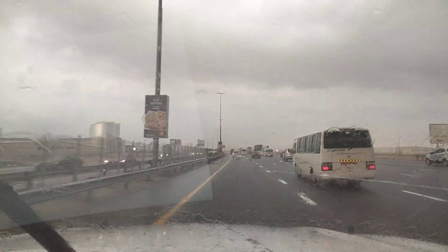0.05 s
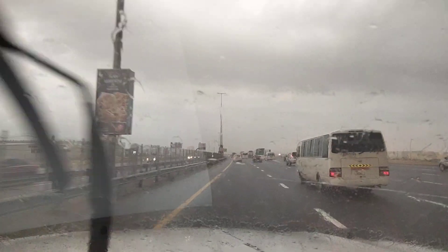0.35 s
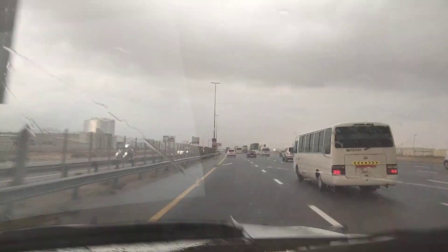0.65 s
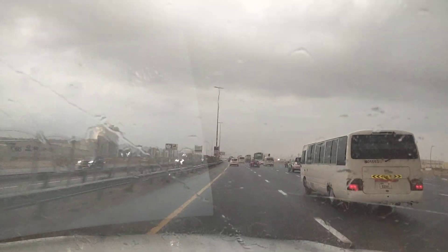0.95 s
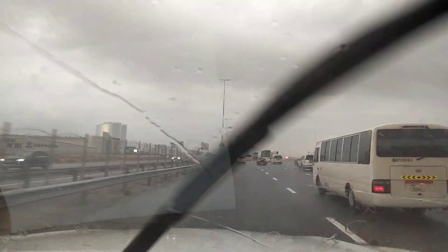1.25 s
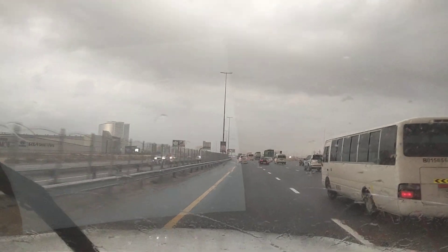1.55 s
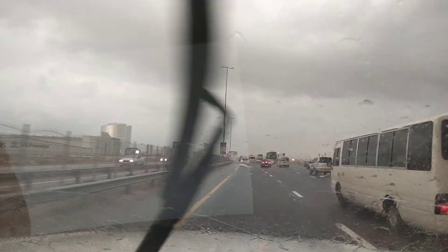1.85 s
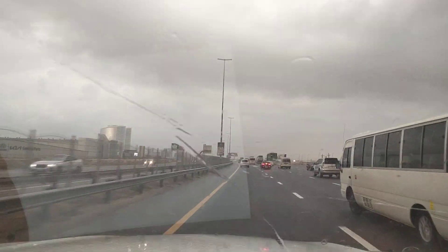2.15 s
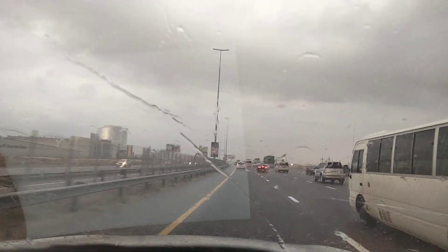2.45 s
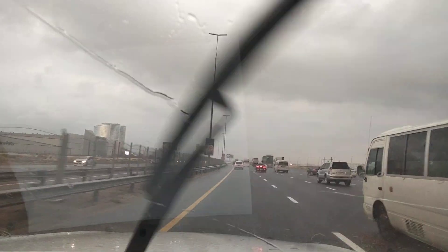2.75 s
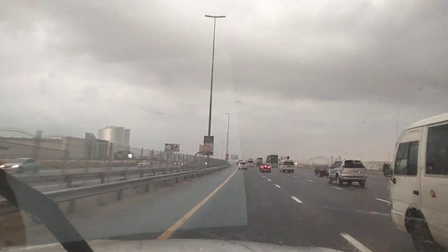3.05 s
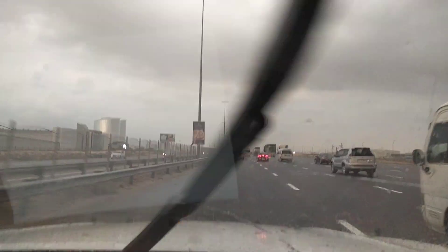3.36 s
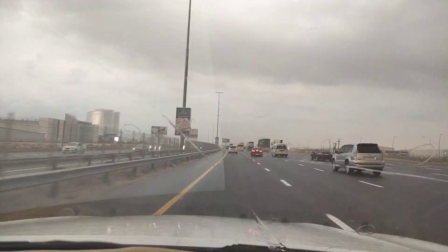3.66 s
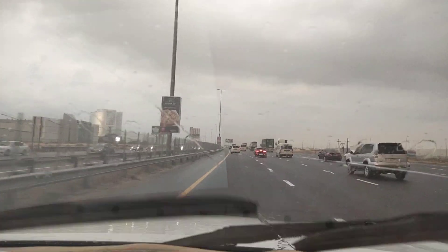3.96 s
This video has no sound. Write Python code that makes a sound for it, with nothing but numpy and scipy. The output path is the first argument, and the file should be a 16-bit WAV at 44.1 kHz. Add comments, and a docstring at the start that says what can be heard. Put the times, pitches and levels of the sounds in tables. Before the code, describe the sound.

Raindrops tap on a car's windshield, heard from inside above a low driving rumble.

```python
"""Driving through heavy rain

Inside a car on a wet highway, rain patters on the windscreen over a hiss of spray. Each drop taps,
splashes and makes the glass ring. Past the middle the rain thins out and single fat drops stand clear.
Underneath, the engine booms in the cabin, the road rumbles through the floor and the tyres sing."""
import sys
import numpy as np
from scipy.fft import rfft, irfft, next_fast_len
from scipy.io import wavfile
from scipy.ndimage import map_coordinates

SR = 44100
rng = np.random.default_rng(int(sys.argv[2]) if len(sys.argv) > 2 else 0)


def pcm_store(signal):
    """Save signal as 16-bit PCM."""
    levels = np.round(np.clip(np.atleast_2d(signal), -1, 1) * 32767)
    wavfile.write(sys.argv[1], SR, levels.astype(np.int16).T)


N = 176400  # 4 seconds

# How hard it rains. Columns: time_s, strength_db
RAIN_STRENGTH = [(0, 0.1), (.5, 1.5), (.7, 2.1), (.88, -0.8), (1.05, 3), (1.35, 0), (1.9, 0), (2.35, -3.5),
                 (2.7, -5), (3.05, -7), (3.45, -7.5), (3.57, -9.5), (3.64, -8.5), (4, -7.5)]


def patter(base_drops_per_s, level_db, treble_db, crowding, spots=30):
    """Drops land at random on the glass; crowding sets how much heavier rain adds to their number."""
    rain_db = curve(RAIN_STRENGTH)
    clump_db = .95 - .07 * rain_db  # rain comes in clumps, which even out as it gets heavier
    strength_db = rain_db + clump_db * wobble(per_s=38)
    drops_per_s = base_drops_per_s * amp(crowding * strength_db) ** 2
    landed = rng.random(N) < drops_per_s / SR
    sizes = amp(4.3 * np.minimum(rng.standard_normal(N), 1))
    hits = unit(landed * sizes / np.sqrt(drops_per_s)) * amp(level_db + strength_db)
    spot = rng.integers(spots, size=N)
    sounds = []
    for _ in range(spots):  # each spot on the glass has its own brightness and pitch
        spot_treble_db = treble_db + 7.5 * rng.uniform(-0.76, 1)
        sounds.append(drop(spot_treble_db, ring_hz=2200 * np.exp(rng.normal(0, .08))))
    out = np.zeros((2, N))
    for i in np.flatnonzero(landed):
        add(out, i / SR, hits[i] * sounds[spot[i]])
    return out


# Heavy drops, before the boosts below. Columns: start_s, level_db, treble_db, pitch_hz
HEAVY_DROPS = [(0.2008, -21.5, -6, 2270), (0.249, -32, 9, 2640), (0.6596, -7, -27, 2190),
               (0.7242, -10.5, -37, 2240), (0.837, -12, -23, 2140), (0.9094, -18.5, -10.5, 3130),
               (1.187, -17, -9, 2120), (1.2377, -17.5, -14, 2240), (1.2665, -15.5, -18, 3410),
               (1.357, -16, -20, 3300), (1.412, -12.5, -29, 2377), (1.463, -17.5, -11, 3300),
               (1.553, -13, -14.5, 3280), (1.66, -12.5, -16, 3400), (1.6787, -14.5, -11, 1900),
               (1.713, -16.5, -10, 3270), (1.778, -18, -13, 3270), (1.81, -18.5, -15, 4220),
               (1.845, -11.5, -36, 2029), (1.8968, -12.5, -17, 4260), (1.94, -15, -26, 2300),
               (2.019, -12, -20, 3400), (2.0961, -16, -8, 3810), (2.1102, -10.5, -17, 1890),
               (2.147, -14, -15, 2200), (2.163, -13, -17, 3400), (2.231, -13, -16, 1940),
               (2.2593, -10.5, -17, 3437), (2.2908, -11, -23, 3950), (2.308, -12, -20, 3340),
               (2.336, -17, -22, 3430), (2.3899, -11.5, -23, 2330), (2.421, -12, -17, 3220),
               (2.466, -15, -16, 1950), (2.518, -14, -20, 4100), (2.571, -22, -6.5, 3200),
               (2.592, -16, -24, 3570), (2.607, -14, -15.5, 3170), (2.6339, -11.5, -23, 1760),
               (2.7326, -16, -20, 2010), (2.7689, -15.5, -19.5, 2000), (2.869, -15.5, -25, 3300),
               (2.9117, -19, -18, 2455), (2.947, -30, 0, 2830), (3.008, -25.5, -9, 3300),
               (3.1142, -14, -24, 2300), (3.1592, -12.5, -21, 3270), (3.184, -22, -14, 3300),
               (3.236, -12, -23.5, 2400), (3.256, -27, -24, 3130), (3.3421, -20.5, -20, 2450),
               (3.3776, -19.5, -12.5, 3420), (3.4045, -24, -23, 2200), (3.438, -23, -27, 2240),
               (3.501, -20.5, -22, 3500), (3.6182, -20.5, -20, 2375), (3.652, -18, -32, 2400),
               (3.6737, -14, -15, 2380), (3.717, -27, -11, 3150), (3.733, -25, -23, 3300),
               (3.7637, -21, -17, 1880), (3.795, -30, -12, 1610), (3.842, -24, -15, 3300),
               (3.8723, -24, -11, 1930), (3.906, -21, -15, 2350)]


def fat_drops(boost_db=12.5, treble_boost_db=20.5, best_ring_hz=2400):
    """Each heavy drop ticks and scatters two quieter droplets; the glass rings best near one pitch."""
    out = np.zeros((2, N))
    for start_s, level_db, treble_db, pitch_hz in HEAVY_DROPS:
        droplets = [(.008 * rng.random(), -7.5) for _ in range(2)]
        octaves_away = abs(np.log2(pitch_hz / best_ring_hz))
        for delay_s, hit_db in [(0.00058, 0)] + droplets:
            tick = drop(treble_db + treble_boost_db, pitch_hz, ring_db=-9 - 16 * octaves_away)
            add(out, start_s + delay_s, amp(level_db + boost_db + hit_db) * tick)
    return out


# Drops that burst. Columns: start_s, length_s, droplet_level_db
BURSTS = [(0.195, 0.025, -17.5), (0.228, .016, -19.5), (1.072, .012, -15.5)]


def bursting_drops(droplets=10):
    """A large drop bursts into a short, bright shower of droplets."""
    out = np.zeros((2, N))
    for start_s, length_s, level_db in BURSTS:
        for delay_s in length_s * (np.arange(droplets) + rng.random(droplets)) / droplets:
            tick = drop(treble_db=16, ring_hz=2200, treble_from_hz=4000)
            add(out, start_s + delay_s, amp(level_db) * tick)
    return out


def drop(treble_db, ring_hz, ring_db=-13, treble_from_hz=5000):
    """One drop taps and splashes, the glass rattles and rings, and the cabin echoes."""
    t = np.arange(SR // 12) / SR

    def fading(wave, fade_s, db):
        """Make a wave die away by 60 dB in fade_s, then set its average level."""
        return amp(db) * unit(wave * amp(-60 * t / fade_s))

    tap = amp(-13) * unit(1. * (t == 0))
    splash = fading(rng.standard_normal(len(t)), fade_s=.007, db=-3)
    rattle = fading(rng.standard_normal((2, len(t))), fade_s=.031, db=-6.5)
    ring = fading(np.sin(2 * np.pi * (ring_hz * t + rng.random((2, 1)))), fade_s=.016, db=ring_db)
    echo = fading(rng.standard_normal((2, len(t))), fade_s=.056, db=-6.5)
    sound = unit(tap + splash + rattle + ring + echo) / np.sqrt(len(t))
    lag_s = abs(rng.normal(.0005, .00006))  # the sound reaches the left side first
    sound[1] = np.pad(sound[1], (int(lag_s * SR), 0))[:len(t)]
    return filtered(sound, lambda hz: causal(amp(treble_db / (1 + (treble_from_hz / (hz + 1)) ** 4))))


# The tone of the spray. Columns: frequency_hz, level_db
SPRAY_TONE = [(500, 6), (2000, -4.5), (3600, -1), (6000, -7), (10000, 3), (14000, -2)]


def spray():
    """Fine spray fizzes on the glass, flickering as it rises and falls with the rain."""
    fizz = unit(filtered(rng.standard_normal((2, N)), lambda hz: amp(along(SPRAY_TONE, hz))))
    return amp(-34.5 + 0.9 * curve(RAIN_STRENGTH) + 2.2 * wobble(per_s=22.05)) * fizz


# How well sound gets through the glass to each side. Columns: frequency_hz, gain_db
GLASS_LEFT = [(150, -19.5), (500, -4), (1100, -4.5), (1400, -3), (1900, -7), (2250, -4.5), (3300, -1.5),
              (5000, -6), (6500, -13), (7300, -19), (8500, -17.5), (10000, -19), (11500, -18.5),
              (14000, -24.5)]
GLASS_RIGHT = [(150, -26), (500, -8), (1100, -2), (1600, 0.5), (2050, 0), (2300, -0.9), (2700, 0.5),
               (3400, 2.8), (3900, 0), (4400, -2.5), (5400, -1.5), (6300, -5.5), (7500, -4.5), (9000, -17),
               (10500, -14.5), (14000, -14)]


def windscreen(water):
    """The glass colours the water sounds on their way into the cabin."""
    return filtered(water, lambda hz: causal(unit(amp([along(GLASS_LEFT, hz), along(GLASS_RIGHT, hz)]))))


# How fast the engine fires. Columns: time_s, rate_hz
FIRING_RATE = [(0, 54.64), (.8, 55.5), (1.9, 54.77), (4, 54.14)]
# The tones in its hum. Columns: multiple_of_firing_rate, level_db
ENGINE_TONES = [(1, -1), (2, -22.5), (3, -23.5), (4, -25), (6, -35)]
# How its boom swells and dips. Columns: time_s, level_db
BOOM_LEVEL = [(0, -25.5), (.2, -16), (.35, -19), (1, -18), (1.15, -21), (1.5, -16.5), (2.25, -18.5),
              (2.4, -15.5), (2.85, -18.5), (3.27, -16), (3.6, -18), (3.75, -16), (4, -19.5)]


def engine():
    """The engine's firing booms in the cabin, with weak, wavering higher tones."""
    phase = 2 * np.pi * np.cumsum(curve(FIRING_RATE)) / SR
    hum = np.zeros(N)
    for multiple, level_db in ENGINE_TONES:
        waver_db = (-0.5 if multiple == 1 else 1) * wobble(per_s=18)
        hum += amp(level_db + waver_db) * np.sin(multiple * phase + rng.uniform(0, 2 * np.pi))
    return amp(curve(BOOM_LEVEL) - 0.5) * unit(hum)


# The tone of the road rumble. Columns: frequency_hz, level_db
RUMBLE_TONE = [(15, -26), (26, -4), (38, -0.5), (56, 2), (76, -3.5), (92, -4), (125, 0.5), (160, -6.5),
               (200, -8), (300, -14), (400, -16), (540, -18.5), (750, -24.5), (1000, -26.5), (2000, -28.5),
               (6000, -58)]
# How alike its two sides are (1 the same, -1 opposite). Columns: frequency_hz, likeness
RUMBLE_LIKENESS = [(60, 0.98), (150, 0.94), (270, 0.74), (420, 1), (540, 0.05), (900, 0.83), (1300, -0.25)]
# Which side is louder. Columns: frequency_hz, left_minus_right_db
RUMBLE_BALANCE = [(60, 1.5), (150, -1.3), (270, 2), (500, 0.2), (1000, -2)]


def road():
    """The road rumbles through the floor, nearly the same on both sides in the bass."""
    def shares(hz):
        """Split the rumble into a part both sides share and a part where they are opposite."""
        angle = np.arccos(np.clip(along(RUMBLE_LIKENESS, hz), -1, 1)) / 2
        return amp(along(RUMBLE_TONE, hz)) * [np.cos(angle), np.sin(angle)]

    shared, opposite = filtered(rng.standard_normal((2, N)), shares)
    rumble = np.array([shared + opposite, shared - opposite])
    rumble = filtered(rumble, lambda hz: amp(along(RUMBLE_BALANCE, hz) * np.array([[.5], [-.5]])))
    return amp(-23.5 - 0.2 * wobble(per_s=7.7)) * unit(rumble)


# The notes the tyres sing. Columns: pitch_hz, width_hz, level_db
TYRE_NOTES = [(362, 26, -44.5), (496, 10, -45.5), (606, 24, -43.5), (783, 29, -48), (914, 65, -40)]
# How their song swells. Columns: time_s, gain_db
TYRE_GAIN = [(0, -1), (2.2, 0), (3, -1), (4, 0.5)]


def tyres():
    """The tread sings in a few narrow bands of noise, a little stronger as the road drains."""
    song = np.zeros((2, N))
    for pitch_hz, width_hz, level_db in TYRE_NOTES:
        band = filtered(rng.standard_normal((2, N)), lambda hz: 1 / (1 + ((hz - pitch_hz) / width_hz) ** 2))
        song += amp(level_db) * unit(band)
    return song * amp(curve(TYRE_GAIN))


def amp(db):
    """Turn decibels into a number to multiply by."""
    return 10 ** (np.asarray(db) / 20)


def unit(x):
    """Scale to an average level (rms) of 1."""
    return x / np.sqrt(np.mean(x ** 2) + 1e-20)


def along(points, hz):
    """Read between the rows of a frequency table, with octaves evenly spaced."""
    frequencies, values = np.transpose(points)
    return np.interp(np.log(hz + 1), np.log(frequencies + 1), values)


def curve(rows):
    """Join the rows of a time table into one value per sample."""
    return np.interp(np.arange(N) / SR, *np.transpose(rows))


def wobble(per_s):
    """A smooth curve through per_s random values each second."""
    return map_coordinates(rng.standard_normal(256), [np.arange(N) * per_s / SR], mode="wrap")


def filtered(x, response):
    """Turn each frequency in x up or down by response(hz)."""
    size = next_fast_len(x.shape[-1] + SR // 8)
    return irfft(rfft(x, size) * response(np.fft.rfftfreq(size, 1 / SR)), size)[..., :x.shape[-1]]


def causal(gain):
    """A filter with these gains that rings only after a hit, never before (minimum phase)."""
    cepstrum = irfft(np.log(np.maximum(gain, 1e-6)))
    half = cepstrum.shape[-1] // 2
    return np.exp(rfft(cepstrum * np.r_[1, np.full(half - 1, 2), 1, np.zeros(half - 1)]))


def add(out, start_s, sound):
    """Mix a sound into out, cutting off whatever runs past the end."""
    stretch = out[:, round(start_s * SR):][:, :sound.shape[1]]
    stretch += sound[:, :stretch.shape[1]]


def scene():
    """Rain comes through the windscreen and driving noise comes from below."""
    drive = (engine() + road()) * amp([[-0.7], [0.7]])  # nudged to the right
    small_drops = patter(base_drops_per_s=2100, level_db=-29, treble_db=-1, crowding=.9)
    # tiny, fast droplets tick brightly among the patter
    ticks = patter(base_drops_per_s=110, level_db=-42.5, treble_db=11.5, crowding=.55)
    return drive + tyres() + windscreen(spray() + small_drops + ticks + fat_drops() + bursting_drops())


def record(dry, top_hz=14280):
    """Cut away the very highest treble."""
    return filtered(dry, lambda hz: hz < top_hz)


dry = scene()
out = record(dry)
pcm_store(out)
```